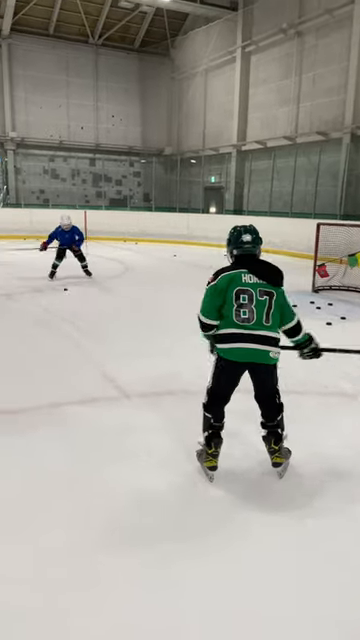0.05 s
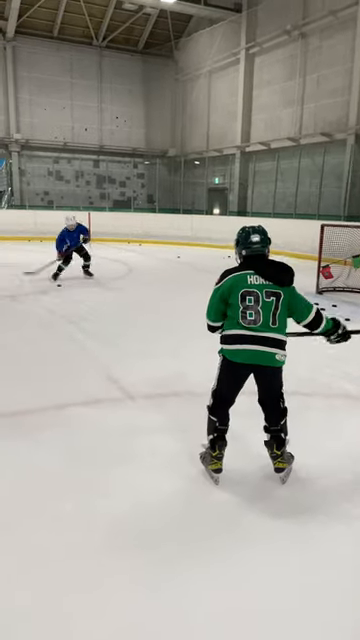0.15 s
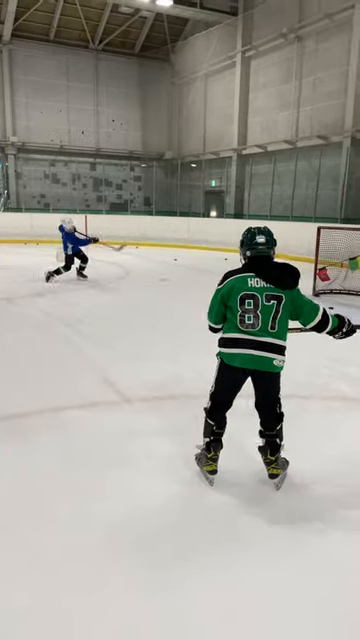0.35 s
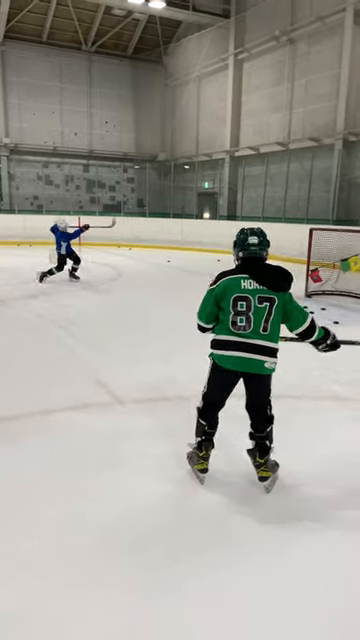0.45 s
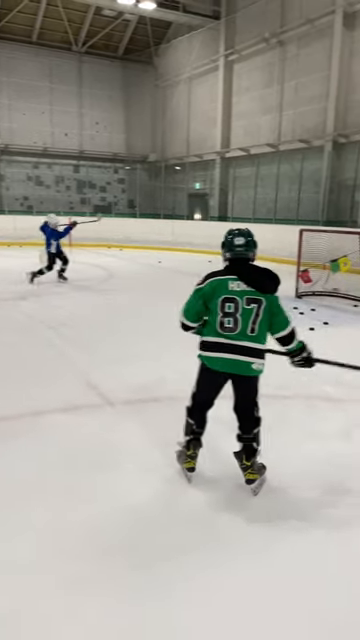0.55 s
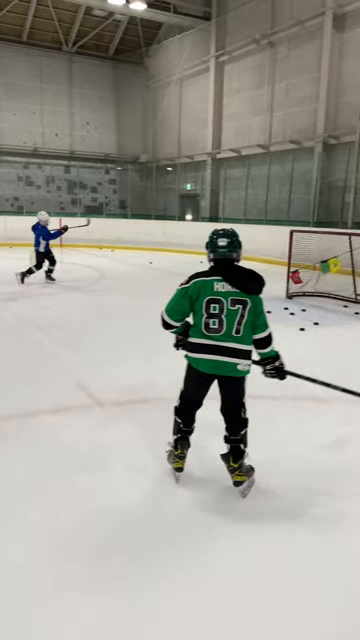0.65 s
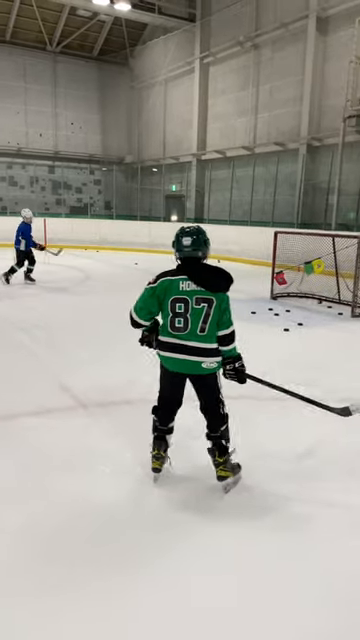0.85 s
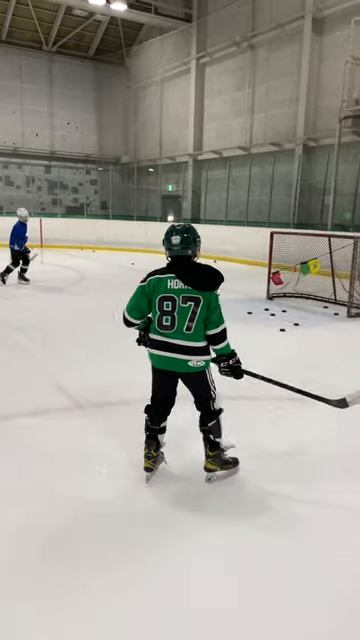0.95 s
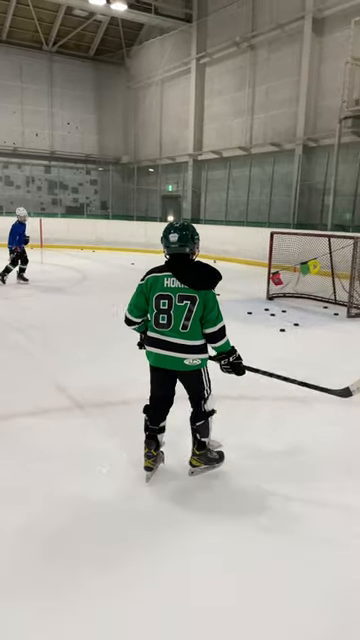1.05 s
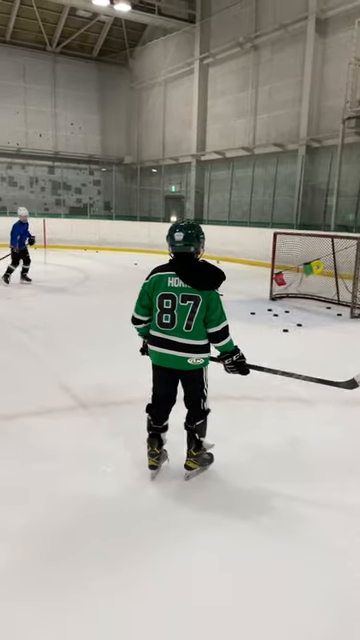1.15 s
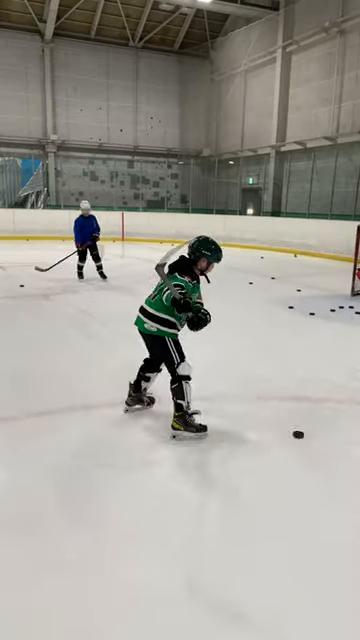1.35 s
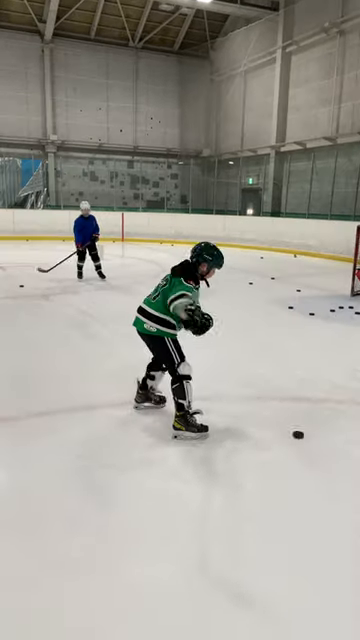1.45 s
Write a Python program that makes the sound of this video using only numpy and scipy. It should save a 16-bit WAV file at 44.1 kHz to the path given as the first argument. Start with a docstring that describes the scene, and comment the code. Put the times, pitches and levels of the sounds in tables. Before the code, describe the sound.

In a large reverberant ice rink, a stick slap is followed by a ringing metallic puck hit and a later hollow knock, over low hum; the ringing cuts off abruptly near the end, leaving quieter air.

```python
"""A stick shot in a large indoor ice rink: the blade slaps ice and puck and clatters, as short noise bursts.
The puck then strikes the steel goal frame, which rings as beating tones, and knocks hollowly once more.
The hall is decaying noise that rings long and throws the shot back from its far walls.
Under it hums the cooling plant, a stack of sines, with a wash of filtered noise and a few light taps.
Just after a light tap the ringing breaks off abruptly, leaving the hum, a quieter hall and a last faint tap."""
import sys
import numpy as np
from scipy import signal
from scipy.fft import rfft, irfft, next_fast_len
from scipy.io import wavfile

SR = 44100
rng = np.random.default_rng(int(sys.argv[2]) if len(sys.argv) > 2 else 0)


def to_wav(s):
    """Save 16-bit WAV."""
    ch = np.atleast_2d(s).T  # columns
    pcm = np.round(np.clip(ch, -1, 1) * 32767)  # PCM
    wavfile.write(sys.argv[1], SR, pcm.astype(np.int16))


N = 66150
TIME = np.arange(N) / SR   # seconds
SIZE = next_fast_len(3 * N)   # padded length for filtering by spectrum
HZ = np.maximum(np.arange(SIZE // 2 + 1) * SR / SIZE, 1)   # no zero, so that logarithms work


def from_db(db):
    """Decibels to gain."""
    return 10 ** (np.asarray(db) / 20)


def at_hz(points, hz):
    """Read a table of (Hz, value) between its points, on a logarithmic pitch axis."""
    point_hz, value = np.transpose(points)
    return np.interp(np.log(hz), np.log(point_hz), value)


def noise():
    """Two unrelated white noises."""
    return rng.standard_normal((2, N))


def colour(x, spectrum):
    """Filter to a spectrum with no sound ahead of its cause (minimum phase), keeping white noise's power."""
    gain = from_db(at_hz(spectrum, HZ))
    even_gain = gain / np.sqrt(np.mean(gain ** 2))
    cepstrum = irfft(np.log(even_gain), SIZE)
    # folding the cepstrum onto its first half gives the minimum-phase response
    response = np.exp(rfft(2 * cepstrum[:SIZE // 2], SIZE) - cepstrum[0])
    return irfft(rfft(x, SIZE) * response, SIZE)[..., :N]


def resonate(x, hz, q, gain):
    """Add one resonance to a sound, as a body does that favours one pitch."""
    tiny = 1e-18   # keeps the filter off exact silence
    return x + gain * signal.lfilter(*signal.iirpeak(hz, q, fs=SR), x + tiny)


# How alike left and right are. Each row: pitch in Hz, likeness from -1 to 1.
LIKENESS = [(100, 1), (220, .995), (450, .86), (900, .9), (1500, .8), (2500, .45), (3700, .42), (5500, -.1),
            (7200, .35), (9500, .8)]
# How much louder the left is, at a lean of 1. Each row: pitch in Hz, left minus right in dB.
BALANCE_DB = [(100, 0), (150, .4), (450, .5), (800, -2), (1400, -8), (2300, -1.2), (3700, -.5), (5500, -1)]
LEFT_LAG_S, LAG_TOP_HZ = 0.00012, 3860   # above this pitch the lag's phase shift stays put


def spread(pair, lean):
    """Two signals become left and right: alike in the bass, less so in the treble, the left a little late."""
    mid, side = rfft(pair, SIZE)
    alike = np.clip(at_hz(LIKENESS, HZ), -1, 1)
    sign = np.array([[1], [-1]])   # left, right
    both = np.sqrt((1 + alike) / 2) * mid + sign * np.sqrt((1 - alike) / 2) * side
    # (1 + sign) is 2 on the left and 0 on the right, so only the left lags
    late = np.exp(-1j * np.pi * (1 + sign) * np.minimum(HZ, LAG_TOP_HZ) * LEFT_LAG_S)
    balance = from_db(lean * sign * at_hz(BALANCE_DB, HZ) / 2)
    return irfft(both * balance * late, SIZE)[:, :N]


CONTACT_RISE_S = 0.00035
BODY_GAIN, BODY_Q = 1.14, 3.9   # height and sharpness of the dull part's pitch
BRIGHT_Q = 3.8   # sharpness of the bright part's pitch


def contacts(hits, dull_spectrum, bright_spectrum, push):
    """Each contact is a dull push and a bright burst, each with its own pitch, dying in milliseconds."""
    dull, bright = 0, 0
    share = np.clip(push, 0, 1)   # part of the dull power that is one clean push, the rest is grit
    dull_grit, bright_grit = np.sign(noise()), np.sign(noise())
    for start, dull_db, bright_db, decay, body_hz, bright_hz, strength in hits:
        age = np.maximum(TIME - start, 0)
        burst = (1 - np.exp(-age / CONTACT_RISE_S)) * np.exp(-age / decay)
        knock = np.sqrt(1 - share) * burst * dull_grit
        # the push is a single sample in the first (middle) signal
        knock[0, int((start + CONTACT_RISE_S) * SR)] += np.sqrt(share * np.sum(burst ** 2))
        dull = dull + from_db(dull_db) * resonate(knock, body_hz, BODY_Q, BODY_GAIN)
        bright = bright + from_db(bright_db) * resonate(burst * bright_grit, bright_hz, BRIGHT_Q, strength)
    return colour(dull, dull_spectrum) + colour(bright, bright_spectrum)


BEAT_DEPTH, WAVER_DB = 0.75, 1.5   # depth of the swelling (0 to 1); typical size of the random wavering


def ring(modes, start):
    """A blow sets tones ringing; each dies away, swells and fades at its beat rate and wavers at random."""
    out = 0
    age = np.maximum(TIME - start, 0)
    depth = np.clip(BEAT_DEPTH, 0, 1)
    knots = np.linspace(0, N / SR, num=45)
    for hz, level_db, t60, beats in modes:
        phase = rng.uniform(0, 2 * np.pi) + np.array([[0], [np.pi / 2]])
        waver = WAVER_DB * np.interp(TIME, knots, rng.standard_normal(len(knots)))
        beat = (1 - depth * np.cos(2 * np.pi * beats * age)) / (1 + depth)
        level = from_db(level_db + waver - 60 * age / t60)
        out = out + beat * level * np.sin(2 * np.pi * hz * age + phase)
    return (TIME >= start) * out


# How long the hall rings. Each row: pitch in Hz, time to die by 60 dB in seconds.
HALL_T60 = [(100, 8.3), (300, 5.7), (500, 4.5), (1000, 3.4), (2500, 2.15), (4500, 0.78), (7000, 0.89),
            (10000, 1), (16000, .2)]
# Colour of the hall's ringing. Each row: pitch in Hz, level in dB.
HALL_COLOUR = [(100, 1), (250, -3.5), (450, 3.5), (650, -3.5), (1100, -1), (2300, -1), (4500, 2),
               (7000, -3.5), (10000, 4.5), (16000, -41)]
# Extra colour of the far walls' return. Each row: pitch in Hz, level in dB.
FAR_COLOUR = [(250, -15), (600, 2), (1100, -2), (1700, -0.5), (2500, -12), (5000, -12), (8000, -20.5),
              (12000, -41)]
FAR_WALL_S, FAR_SPREAD_S = .30, 0.083   # the return's delay and its blur
HALL_RISE_S = 0.0028


def hall(x, near_db, near_s, tail_db, far_db):
    """Quick reflections from ice and boards, a tail dying band by band, and a blurred far-wall return."""
    white, response = rfft(noise(), SIZE), 0
    centres = np.geomspace(60, 16000, num=17)
    near = from_db(near_db) * np.exp(-TIME / near_s)
    far_bump = from_db(far_db) * np.exp(-.5 * ((TIME - FAR_WALL_S) / FAR_SPREAD_S) ** 2)
    # each band is a triangle on the log pitch axis: 1 at its centre, 0 at its neighbours
    for hz, share in zip(centres, np.eye(len(centres))):
        band = irfft(white * np.interp(np.log(HZ), np.log(centres), share), SIZE)[:, :N]
        late = from_db(tail_db - 60 * TIME / at_hz(HALL_T60, hz))
        far = far_bump * from_db(at_hz(FAR_COLOUR, hz))
        envelope = np.sqrt(late ** 2 + near ** 2 + far ** 2)
        response = response + band * from_db(at_hz(HALL_COLOUR, hz)) * envelope
    rise = 1 - np.exp(-TIME / HALL_RISE_S)
    return signal.fftconvolve(x, response * rise, axes=1)[:, :N]


# How the hum swells and fades.
# Each row: time in seconds, then levels in dB of the 2nd multiple, the 3rd, and the 4th and 5th alike.
HUM = [(0, -49.5, -46.5, -48), (.22, -42, -41.5, -47), (.33, -67, -75, -66), (.48, -47.5, -49, -57),
       (0.561, -38.5, -51, -48), (0.851, -42, -42.5, -54), (1.019, -46, -40.5, -49.5),
       (1.15, -62, -44, -56.5), (1.251, -56, -48, -51.5), (1.288, -37.5, -50, -51.5),
       (1.5, -42, -36.5, -48.5)]
PLANT_HZ = 33.42   # the compressor's turning rate


def plant_hum():
    """Low multiples of the compressor's turning rate, each swelling and fading."""
    times, second, third, upper = np.transpose(HUM)
    hum = 0
    for multiple, db in enumerate((second, third, upper, upper), 2):
        level = np.sqrt(2) * from_db(np.interp(TIME, times, db))
        turns = multiple * PLANT_HZ * TIME + rng.random()
        hum = hum + level * np.sin(2 * np.pi * turns)
    return hum


# Colour of the hall's wash before the break. Each row: pitch in Hz, level in dB.
BUSY_AIR = [(25, -7.5), (60, -23.5), (120, -3.5), (220, -6), (420, -6), (600, -9.5), (1000, -8),
            (1700, -11.5), (2600, -10.5), (3500, -19.5), (6000, -30.5), (8000, -39), (10000, -70.5)]
# Colour of the quieter wash after it. Each row: pitch in Hz, level in dB.
QUIET_AIR = [(25, -14), (60, -8), (120, -2.5), (220, -6), (400, -12.5), (650, -16), (1000, -21),
             (1600, -27), (2500, -28), (4000, -36), (7000, -42), (10000, -59)]
BUSY_DB, BUSY_FADE_DB_PER_S, QUIET_DB = -37.5, 4.5, -44


def hall_air(before):
    """The wash of the hall is filtered noise: slowly fading before the break, quieter and steady after."""
    busy = from_db(BUSY_DB - BUSY_FADE_DB_PER_S * TIME) * colour(noise(), BUSY_AIR)
    quiet = from_db(QUIET_DB) * colour(noise(), QUIET_AIR)
    return before * busy + (1 - before) * quiet


# Light stick taps on the ice. Each row: start in seconds, dull level in dB, bright level in dB,
# decay time in seconds, body pitch in Hz, brightest pitch in Hz, strength of that pitch.
TAPS = [(.4315, -49, -33.5, 0.0055, 900, 2400, 5), (1.2545, -30.5, -40.5, 0.0054, 1400, 3620, 1.1),
        (1.478, -48, -58, .0054, 1300, 2000, 1.5)]
# Colour of a tap's bright part. Each row: pitch in Hz, level in dB.
TAP_CRACK = [(500, -13), (1400, -10), (3000, 2), (5000, -8.5), (7500, -8), (10000, -31), (15000, -45)]


def light_taps():
    """Light taps of a stick on the ice, with the dull colour of the blade and a bright part of their own."""
    return contacts(TAPS, STICK_KNOCK, TAP_CRACK, push=.1)


# The puck meets the goal. Each row: start in seconds, thud level in dB, clank level in dB,
# decay time in seconds, body pitch in Hz, brightest pitch in Hz, strength of that pitch.
GOAL_HITS = [(.6377, -20, -11.5, 0.0049, 796, 5400, 1.44), (.648, -16.5, -18, 0.0046, 793, 5400, 1.8),
             (.6597, -3.5, -22, 0.0015, 885, 4100, 1.7), (.674, -24, -30.5, .026, 465, 2550, 2.6),
             (.716, -21.5, -31, 0.0053, 747, 2550, 2.3)]
# Colour of the thud. Each row: pitch in Hz, level in dB.
GOAL_THUD = [(100, -34.5), (200, -11.5), (300, -8), (480, -5), (780, -2.5), (950, 0), (1250, -8),
             (2000, -22.5), (4000, -52)]
# Colour of the clank. Each row: pitch in Hz, level in dB.
GOAL_CLANK = [(600, -20.5), (1450, 1), (1850, 4), (2400, 6), (2900, 1.5), (3550, -9), (4100, 3), (4800, -8),
              (5400, -6.5), (6200, -12.5), (7700, -13.5), (9500, -53.5), (15000, -53.5)]
# Tones of the ringing steel frame.
# Each row: pitch in Hz, level in dB, time to die by 60 dB in seconds, beats per second.
FRAME_MODES = [(242, -38, 1.2, 4), (427, -33, 1.4, 4.5), (490, -22, .55, 8), (554, -26.5, .85, 5),
               (750, -20.5, .9, 5.6), (736, -30, 3.5, 5.4), (835, -29, .4, 12), (897, -28, 1.6, 2.6),
               (964, -29, .5, 8), (1123, -34, 1.5, 3), (1566, -34, .4, 9), (2299, -29, .35, 14),
               (2557, -29, .2, 11), (4043, -21, .19, 40), (4140, -42, 1.0, 14), (5220, -21, .11, 55),
               (5620, -22, .11, 45)]
# The later, hollow knock. Each row: start in seconds, body level in dB, click level in dB,
# decay time in seconds, body pitch in Hz, brightest pitch in Hz, strength of that pitch.
KNOCK_HITS = [(1.0217, -21.5, -32, 0.0039, 866, 4060, 2), (1.027, -25.5, -34, 0.0031, 1200, 5160, 0.72),
              (1.0377, -17, -39.5, 0.0026, 1070, 4160, 1)]
# Colour of the knock's hollow body. Each row: pitch in Hz, level in dB.
KNOCK_BODY = [(200, -23), (500, -15), (680, 3), (870, 0.5), (1250, -4), (1600, -11.5), (4000, -39)]
# Colour of its steely click. Each row: pitch in Hz, level in dB.
KNOCK_CLICK = [(1500, -14.5), (3500, -12.5), (4100, 3.5), (4700, -5.5), (5400, -6), (6800, -11),
               (9500, -27.5), (15000, -32.5)]
# Tones that the knock sets ringing.
# Each row: pitch in Hz, level in dB, time to die by 60 dB in seconds, beats per second.
KNOCK_MODES = [(736, -31.5, .7, 7), (4060, -43, .5, 23), (4170, -44, .5, 37), (4400, -47, .45, 31)]
TICK_DB, TICK_DECAY_S = -20, 0.00099   # the first touch on the steel is a very short, bright tick


def goal():
    """The puck clanks on the ringing frame, thuds into the goal and later knocks once more, hollow."""
    first_s, again_s = GOAL_HITS[0][0], KNOCK_HITS[0][0]
    strike = contacts(GOAL_HITS, GOAL_THUD, GOAL_CLANK, push=0.23)
    knock = contacts(KNOCK_HITS, KNOCK_BODY, KNOCK_CLICK, push=0.59)
    blows = strike + knock
    tick_shape = (TIME >= first_s) * np.exp(-np.abs(TIME - first_s) / TICK_DECAY_S)
    tick = from_db(TICK_DB) * tick_shape * noise()
    room = hall(blows, near_db=-34.0, near_s=0.034, tail_db=-41.5, far_db=-52.0)
    frame = ring(FRAME_MODES, first_s) + ring(KNOCK_MODES, again_s)
    return spread(blows + tick, lean=0.92) + spread(room + frame, lean=0.57)


# The blade meets ice and puck. Each row: start in seconds, knock level in dB, crack level in dB,
# decay time in seconds, body pitch in Hz, brightest pitch in Hz, strength of that pitch.
STICK_HITS = [(.2348, -9, -5.5, 0.003, 1036, 2260, 0.78), (0.2476, -14, -18, 0.0019, 890, 2600, 2.2),
              (0.2507, -15, -8, 0.0026, 1040, 2930, 0.44), (0.2531, -8.5, -21.5, 0.0018, 280, 1160, 1),
              (0.2619, -23, -30, 0.0025, 890, 5850, 1.5), (0.2694, -36, -16, 0.00073, 1080, 2450, 1.4),
              (0.2832, -21.5, -16.5, 0.0017, 550, 3410, 6.3), (.2945, -32, -26, 0.0036, 604, 2530, 3.8),
              (0.3024, -22, -26, 0.0076, 466, 2850, 3), (0.3046, -28, -12.5, 0.0013, 480, 2800, 1.7),
              (.3195, -20.5, -16.5, 0.0028, 520, 2760, 0.91)]
# Colour of the blade's dull knock. Each row: pitch in Hz, level in dB.
STICK_KNOCK = [(50, -12), (130, -6), (250, -2), (350, -2.5), (480, 2.5), (640, 1.5), (850, -3),
               (1100, -0.5), (1400, -4), (1900, -2.5), (4000, -39.5)]
# Colour of the blade's bright crack. Each row: pitch in Hz, level in dB.
STICK_CRACK = [(500, -17.5), (1400, -1.5), (1900, -7.5), (2300, 0), (3000, -2.5), (4000, -5), (4600, -6.5),
               (5700, -7), (7500, -13.5), (10000, -27.5), (12000, -55), (15000, -23)]
# Tones of the briefly ringing stick.
# Each row: pitch in Hz, level in dB, time to die by 60 dB in seconds, beats per second.
STICK_MODES = [(452, -35, .4, 9), (656, -31, 1.1, 8), (1005, -35, .9, 9), (2242, -34, .3, 13),
               (2297, -34, .35, 9)]
# Colour of the end wall's echo. Each row: pitch in Hz, level in dB.
ECHO_COLOUR = [(300, -11.5), (600, -1.5), (1050, 2), (1800, 4), (3000, -14.5), (8000, -29), (12000, -50)]
ECHO_S, ECHO_DB = .293, -15.5   # the end wall sends the slap back as one distinct echo


def stick():
    """The slap of the blade and its clatter, heard directly and back from the end wall and the hall."""
    slap = contacts(STICK_HITS, STICK_KNOCK, STICK_CRACK, push=0.45)
    room = hall(slap, near_db=-41.5, near_s=.022, tail_db=-46.5, far_db=-40)
    echo_gain = from_db(ECHO_DB + at_hz(ECHO_COLOUR, HZ))
    echo_delay = np.exp(-2j * np.pi * HZ * ECHO_S)
    echo = irfft(rfft(slap, SIZE) * echo_gain * echo_delay, SIZE)[:, :N]
    ringing = ring(STICK_MODES, STICK_HITS[0][0])
    return spread(slap, lean=1.0) + spread(room + echo + ringing, lean=0.36)


BREAK_S, BREAK_FADE_S = 1.269, 0.016   # middle and length of the crossfade


def scene():
    """Shot, goal and busy hall until the break, quiet air after it; taps and hum throughout."""
    before = np.clip(.5 + (BREAK_S - TIME) / BREAK_FADE_S, 0, 1)   # 1 before the break, 0 after
    background = spread(hall_air(before) + light_taps(), lean=0.38) + plant_hum()
    shot = stick() + goal()
    return background + before * shot


CUTOFF_HZ = 17000


def record(dry):
    """Peaks are softly rounded, then a steep low-pass filter cuts the top."""
    rounded = np.tanh(dry)
    low_pass = signal.cheby2(16, 70, CUTOFF_HZ, fs=SR, output="sos")   # 70 dB down from the cutoff up
    return signal.sosfilt(low_pass, rounded)


dry = scene()
out = record(dry)
to_wav(out)
```